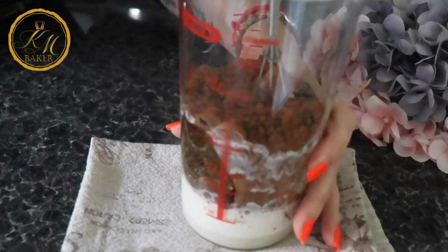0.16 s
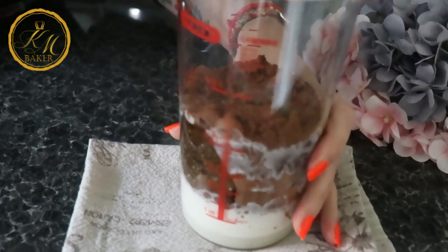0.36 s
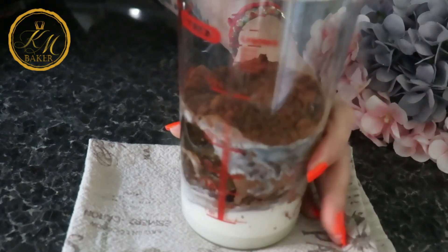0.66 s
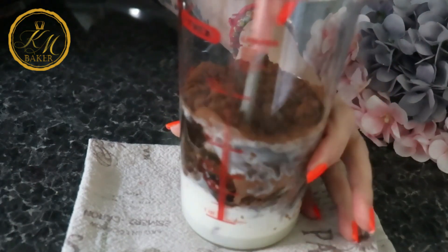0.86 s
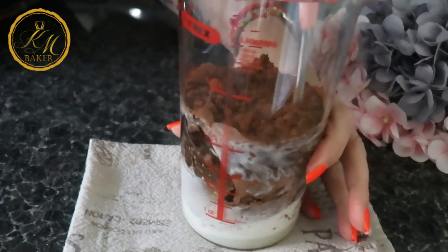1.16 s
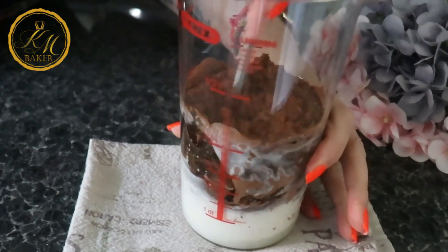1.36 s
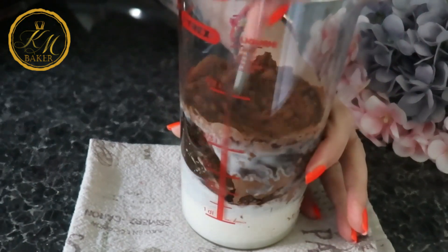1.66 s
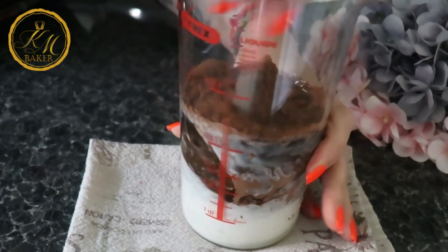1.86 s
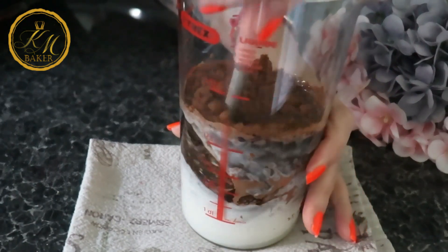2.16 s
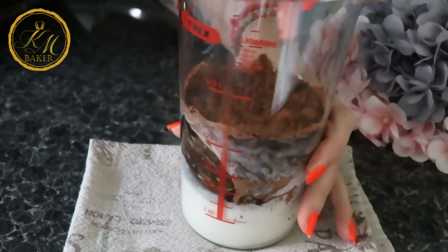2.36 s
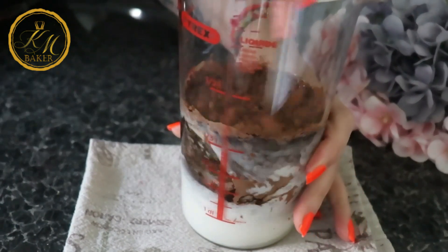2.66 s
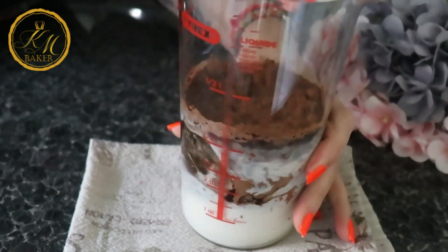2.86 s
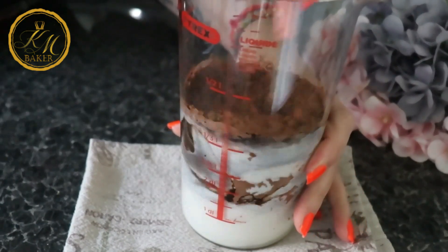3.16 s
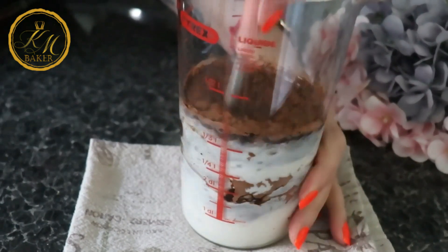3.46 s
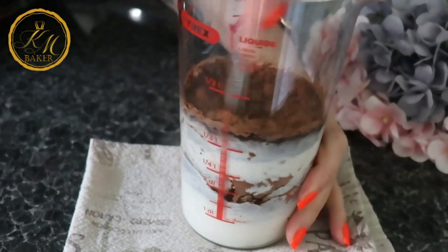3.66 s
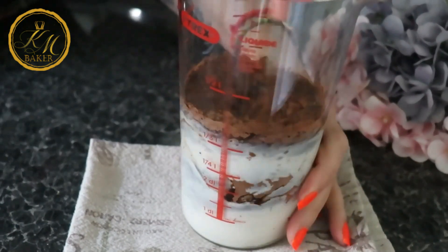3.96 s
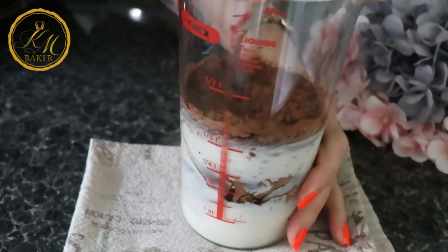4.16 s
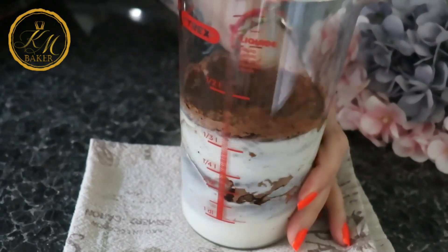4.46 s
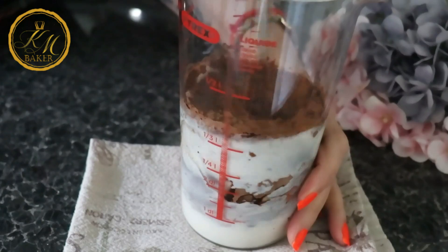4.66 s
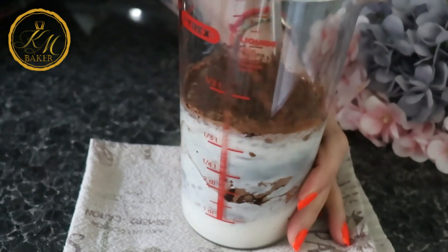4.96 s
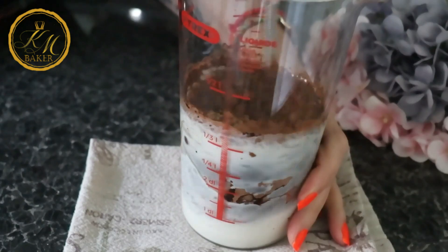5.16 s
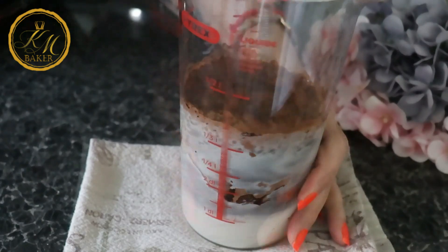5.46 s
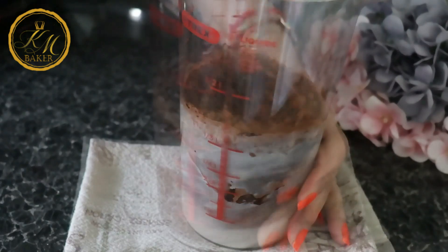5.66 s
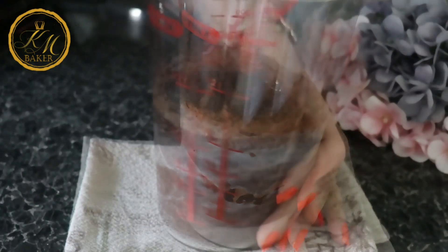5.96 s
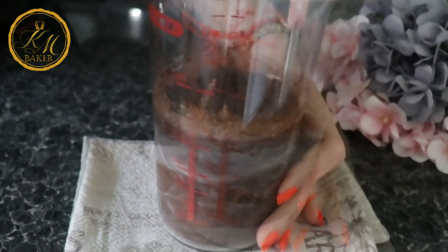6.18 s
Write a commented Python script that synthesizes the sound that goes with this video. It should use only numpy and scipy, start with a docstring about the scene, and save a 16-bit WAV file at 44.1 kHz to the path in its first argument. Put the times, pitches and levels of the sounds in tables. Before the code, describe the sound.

Close, light whisk clicks on a plastic jug with occasional hollow knocks; early on a bird whistles and trills, and the taps grow harder later.

```python
"""A small wire whisk stirs powder and milk in a tall plastic jug on a kitchen counter, close to a two-port microphone.
Filtered noise makes the room: a faint low hum throughout and a hiss that sinks over the first two seconds.
From 0.4 s short noise bursts through resonances tick as wires on the wall; decaying sines ring the knocked jug.
From 0.7 to 1.8 s a songbird outside rasps, whistles downwards and trills: near sines with swept or warbling pitch.
Ticks go on to 6.3 s; a low rumble passes between 4.4 and 5.1 s, and the hiss swells from 5.9 s and sinks at the end."""
import sys
import numpy as np
from scipy import signal
from scipy.fft import rfft, irfft
from scipy.io import wavfile
from scipy.ndimage import uniform_filter1d

SR = 44100
rng = np.random.default_rng(int(sys.argv[2]) if len(sys.argv) > 2 else 0)


def voltage_ratio(level):
    """Linear amplitude factor for a level in decibels (scalar or array-like)."""
    return 10 ** (np.asarray(level, float) / 20)


def file_out(sig):
    """Save sig as 16-bit WAV at sys.argv[1]."""
    # one column per channel
    cols = np.atleast_2d(sig).T
    # limit, then scale
    lim = np.clip(cols, -1, 1)
    pcm = np.round(lim * 32767).astype(np.int16)
    wavfile.write(sys.argv[1], SR, pcm)


N = 278712
T = np.arange(N) / SR
F = np.fft.rfftfreq(N, 1 / SR)
LEFT_RIGHT = np.array([[1], [-1]])  # opposite signs at the two ports


def along(table, hz=F):
    """Read (frequency [Hz], value) points on a log-frequency axis."""
    return np.interp(np.log(hz + 1), np.log(np.array(table)[:, 0]), np.array(table)[:, 1])


def over(table):
    """Read (time [s], value) points at every sample."""
    return np.interp(T, *np.transpose(table))


def unit(x):
    """Scale to rms 1."""
    return x / np.sqrt(np.mean(x ** 2))


def add(out, s, sound):
    """Mix a sound in at s seconds."""
    i = int(s * SR)
    out[..., i:i + sound.shape[-1]] += sound[..., :max(N - i, 0)]


def kitchen_air():
    """Noise in three layers: a low hum, a hiss whose level moves, and a passing rumble around 35 Hz."""
    # colour of the room noise: (frequency [Hz], relative level [dB])
    air = [(13, -54), (22, -25), (81, -11.5), (245, -24.5), (876, -4), (2070, -7), (3500, -10.5),
           (11800, -19), (15200, -23.5), (16500, -59.5)]
    # hiss: (time [s], rms level [dB])
    hiss_level = [(0, -67), (.27, -69.5), (.36, -72), (1.0, -75), (2.0, -80.5), (5.88, -80.5),
                  (5.94, -65.5), (6.15, -64.5), (6.32, -87)]
    # passing low rumble: (time [s], rms level [dB])
    rumble_level = [(4.4, -100), (4.55, -69), (4.9, -71.5), (5.1, -100)]
    hum_db = -78.5
    mid, side = rfft(rng.standard_normal((2, N))) * voltage_ratio(along(air))
    # the bass is more alike at the two ports than the treble
    both = mid + np.clip(F / 900, .5, 1) * side * LEFT_RIGHT
    low = 1 / (1 + (F / 300) ** 4)
    hum = unit(irfft(both * low, N))
    hiss = unit(irfft(both * (1 - low), N))
    deep = np.exp(-(np.log2((F + 1) / 35) / .5) ** 2)
    rumble = unit(irfft(rfft(rng.standard_normal((2, N))) * deep, N))
    return voltage_ratio(hum_db) * hum + voltage_ratio(over(hiss_level)) * hiss + voltage_ratio(over(rumble_level)) * rumble


def ring(modes, chance, length, rise, scatter_db, tilt_db=0):
    """One blow on damped modes, each with its own strength, tuning and sign; peak 1."""
    hz, db, t60 = np.array(modes, float).T[:, :, None]
    strength, sign, tuning = chance[:3, :len(hz), None]
    t = np.arange(int(length * SR)) / SR
    size = voltage_ratio(db + tilt_db + scatter_db * strength) * np.sign(sign)
    tones = np.sin(2 * np.pi * hz * (1 + 0.018 * tuning) * t)
    y = (size * tones * 1000 ** (-t / t60)).sum(axis=0)
    y = y * (1 - np.exp(-t / rise))
    return y / np.abs(y).max()


def jug():
    """Harder blows ring the jug body, most near the favoured mode, and thud into the counter."""
    # blows that shake the whole jug: (time [s], level [dB], favoured ring [Hz], counter thud over the ring [dB])
    knocks = [(0.415, -59, 726, -31), (0.98, -38, 442, -14), (1.338, -27.5, 378, -22),
              (1.683, -41.5, 490, -2), (1.978, -47, 630, -11.5), (2.011, -67, 503, 15),
              (2.251, -46, 670, -12.5), (3.312, -38.5, 602, -10.5), (3.533, -22.5, 435, -23),
              (3.763, -35.5, 647, -17.5), (5.688, -50, 770, -26), (6.06, -26.5, 436, -24)]
    # jug body modes: (frequency [Hz], level [dB], t60 before the hand damps it [s])
    body_modes = [(286, -6.5, 0.021), (352.7, -6, 0.24), (378, -5.5, 0.1), (490.4, -9.5, 0.43),
                  (537.5, 5.5, 0.098), (628.6, 7, 0.077), (691, 3.5, 0.094), (768, 2, 0.17),
                  (1660, -12, 0.038), (2100, -11.5, 0.065), (2640, -9, 0.05)]
    # counter modes: (frequency [Hz], level [dB], t60 [s])
    counter_modes = [(76, 0, 0.26), (106, 0, 0.26), (135, 4, 0.17), (207, 2, 0.22)]
    grip_s, grip_share = .022, .45  # the hand soon damps the ring to this share
    rocking_db = 4  # most the level drifts either way as the base rocks on the towel
    out = np.zeros(N)
    chance = rng.standard_normal((len(knocks), 3, 20))
    drift = uniform_filter1d(uniform_filter1d(rng.standard_normal(N), size=200), size=200)
    rocking = voltage_ratio(rocking_db * np.tanh(unit(drift)))
    mode_hz = np.array(body_modes)[:, :1]
    for (s, db, ring_hz, thud_db), c in zip(knocks, chance):
        near_db = 10 * np.exp(-(np.log2(mode_hz / ring_hz) / .4) ** 2)
        body = ring(body_modes, c, .4, 0.00064, 2.2, near_db)
        body = body * (grip_share + (1 - grip_share) * np.exp(-T[:len(body)] / grip_s))
        thud = ring(counter_modes, c[:, 14:], .4, 0.0013, 2.2)
        add(out, s, voltage_ratio(db) * (body + voltage_ratio(thud_db) * thud))
    return out * rocking


def touches():
    """Every tick, the weak bounce of a trailing wire after it, and a wire dragging on towards a close next tick."""
    # wire on wall: (time [s], level [dB], favoured ring [Hz], wall over wires [dB], upper wires over wires [dB])
    tick_table = [(0.419, -31.5, 3180, -41, -3), (0.4361, -29.5, 7660, -52, -15),
                  (0.5937, -44, 3800, -16.5, -27), (0.7558, -29, 3030, -26, -65),
                  (0.939, -39.5, 6400, -46, -36), (0.9797, -32.5, 5000, 1.5, -2.5),
                  (1.089, -30.5, 5600, -24, -12), (1.1448, -38.5, 7000, -59, -12),
                  (1.3349, -30, 7250, -6, -19.5), (1.349, -33, 2580, -19, -29),
                  (1.3703, -41, 4400, -6, -7.5), (1.406, -31, 3380, -67, -7.5),
                  (1.4235, -28.5, 7200, -20, -20.5), (1.493, -30.5, 3340, -46, -12.5),
                  (1.684, -22, 4630, -8.5, -7.5), (1.691, -23, 2310, -19, -17),
                  (1.728, -23.5, 6050, -13.5, -6.5), (1.738, -31.5, 3950, -30, -13),
                  (1.7832, -32.5, 5040, -22, -5), (1.904, -31.5, 3510, -23, -81),
                  (1.937, -25, 3600, -33, -27.5), (1.9645, -34.5, 3710, -22, -4),
                  (1.9787, -29.5, 5400, -20.5, -11.5), (2.0327, -30.5, 7000, -27, -7.5),
                  (2.2041, -40, 7740, -11, -9.5), (2.242, -38.5, 6900, -5.5, -18),
                  (2.2485, -32.5, 5330, -4.5, -9.5), (2.2893, -31.5, 5300, -8.5, -6),
                  (2.3413, -40.5, 6900, -13.5, -12), (2.4893, -25, 3950, -21, -28),
                  (2.5108, -33, 4830, -16.5, -7.5), (2.549, -28, 5550, -33, -17),
                  (2.568, -37, 5600, -17.5, -1.5), (2.607, -50, 6000, -13, -2),
                  (2.671, -33, 5540, -41, -11.5), (2.776, -37.5, 3330, -28.5, -46),
                  (2.8045, -29, 6050, -58.5, -8), (2.8427, -28.5, 10700, -24.5, -0.5),
                  (2.876, -42, 4550, -21, 0.5), (3.0068, -26.5, 3260, -22.5, -20),
                  (3.039, -29.5, 3410, -42.5, -20), (3.0696, -28.5, 2970, -28, -9.5),
                  (3.104, -21.5, 6070, -26, -2.5), (3.1249, -22.5, 3860, -17, -4.5),
                  (3.29, -32.5, 6400, -17.5, -10), (3.3083, -19.5, 5660, -23.5, -13.5),
                  (3.3133, -24.5, 5670, -16.5, -8), (3.411, -39.5, 6400, -17.5, -13),
                  (3.4983, -43.5, 9130, -1, 6.5), (3.5355, -30.5, 2560, 3.5, -3.5),
                  (3.5667, -30.5, 6200, -11.5, -29.5), (3.592, -29, 6920, -15, -1.5),
                  (3.6185, -41, 3630, -26, -1), (3.7618, -35.5, 2420, -5.5, -7.5),
                  (3.7691, -30, 5750, -11, -11.5), (3.805, -30, 7200, -22.5, -1.5),
                  (3.8346, -38.5, 5540, -22, -42), (3.902, -48, 2920, -8, -24.5),
                  (3.9857, -16.5, 3440, -60.5, -6), (4.003, -29, 6900, -17, -19),
                  (4.033, -34, 3940, -43, -11.5), (4.078, -28, 3900, -28.5, -19.5),
                  (4.178, -29.5, 5530, -23.5, -24), (4.1892, -29, 8470, -65, -6.5),
                  (4.2219, -24, 7430, -31, -1), (4.254, -38.5, 3750, -50, -9.5),
                  (4.4197, -15, 2730, -35, -12), (4.4626, -30.5, 4800, -74, -10.5),
                  (4.632, -25, 3870, -2.5, -42.5), (4.8151, -20, 3040, -12.5, -31),
                  (4.852, -42, 4773, -7.5, -35), (4.9885, -12.5, 4900, -21.5, -3.5),
                  (5.1508, -16, 8330, -18, -4.5), (5.32, -15.5, 8190, -17.5, -4),
                  (5.4916, -15.5, 6840, -16.5, -3.5), (5.5946, -50.5, 3360, -6.5, -39.5),
                  (5.6874, -15, 6160, -21, -12), (5.7035, -45, 3200, -9, -23.5),
                  (5.786, -38.5, 3940, -4.5, -38), (5.9017, -21, 3780, -5, -28),
                  (5.9433, -37, 3340, -2.5, -8.5), (6.0494, -32, 3630, 2.5, 2),
                  (6.0608, -16.5, 2630, -4.5, -23), (6.0945, -37, 3970, 4, -0.5),
                  (6.1209, -35.5, 3600, -33, -12), (6.166, -34, 5600, -8.5, -16),
                  (6.22, -39, 3400, -9, -29), (6.275, -39, 3650, -27, -27)]
    bounce_s, bounce_spread_s = .03, .007  # delay after the tick
    bounce_db, bounce_spread_db = -29, 3  # relative to the tick
    drag_gap_s = .05  # wires drag between ticks closer than this
    drag_db, drag_spread_db = -12, 4  # relative to the weaker of the two ticks
    ticks = np.array(tick_table)
    chance = rng.standard_normal((len(ticks), 3))
    bounces, drags = ticks.copy(), ticks.copy()
    bounces[:, :2] += [bounce_s, bounce_db] + chance[:, :2] * [bounce_spread_s, bounce_spread_db]
    gap = np.diff(ticks[:, 0], append=N)  # the last tick has no close neighbour
    drags[:, 0] += gap * rng.uniform(.3, .9, len(ticks))
    weaker_db = np.minimum(ticks[:, 1], np.roll(ticks[:, 1], -1))
    drags[:, 1] = weaker_db + drag_db + drag_spread_db * chance[:, 2]
    return np.concatenate([ticks, bounces, drags[gap < drag_gap_s]])


def clatter(push, modes, chance, scatter_db, broad, tilt_db=0):
    """A push spectrum through steep resonances of uneven strength; fixed energy."""
    hz, db, width = np.array(modes, float).T[:, :, None]
    tuning, strength = chance[:2, :len(hz), None]
    f = np.linspace(0, SR / 2, len(push))
    hz = hz * (1 + .03 * tuning)
    width = width * broad
    size = voltage_ratio(db + tilt_db + scatter_db / broad * strength)
    resonance = f * width / (hz ** 2 - f ** 2 + 1j * f * width)
    y = irfft(push * (size * resonance ** 3).sum(axis=0))
    return y / np.sqrt((y ** 2).sum() / 14)


def whisk():
    """Each tick: several wires land within milliseconds and chatter on, ringing wires and wall."""
    # damped modes of the wires, the wall and the upper wires, each:
    # (frequency [Hz], level [dB], resonance width in a tick of -30 dB or softer [Hz])
    wires = [(2580, -2, 360), (3260, 0, 560), (3600, 5, 674), (4145, 3, 800), (4900, 3, 680),
             (5600, 5.5, 340), (6400, 3.5, 830), (7000, 7.5, 470), (7740, 4.5, 2330)]
    wall = [(816, -3.5, 67), (930.6, 7.5, 130), (1070, 8, 310), (1307, 8, 370), (1487, 4, 170),
            (1839, 6.5, 630)]
    sheen = [(8516, 14, 250), (10130, 10, 1300), (10740, 5, 1600), (14600, -9, 260), (12400, -3.5, 2200)]
    contact_s, firming_db = 0.00036, 55  # time constant at -31 dB; ten times shorter for so many dB more
    lead_in_s = .0022  # a brief random crackle leads into each tick with this time constant
    broadening_db = 20  # a tick so much harder than -30 dB rings twice as broad and half as uneven
    wire_hum_db, wire_hum_t60_s = -21, 0.052  # peak of the hum relative to the tick's
    pan_db = 3.2  # most each port gains or loses as a tick leans to one side
    lead = .02  # seconds before the landing
    out = np.zeros((2, N))
    t = np.arange(4096) / SR - lead
    after = np.clip(t, 0, 1)
    edges = signal.windows.tukey(len(t), .3)
    hits = touches()
    chance = rng.standard_normal((len(hits), 2, len(t)))
    wire_hz, sheen_hz = np.array(wires)[:, :1], np.array(sheen)[:, :1]
    singing = np.array(wall + wires + sheen, float)
    singing[:, 2] = wire_hum_t60_s
    for (s, db, ring_hz, wall_db, treble_db), c in zip(hits, chance):
        # a harder tick is a shorter contact
        phase = after / (contact_s * 10 ** (-(db + 31.0) / firming_db))
        landing = phase ** 3 * np.exp(3 - phase) / 27
        # a random crackle grows into the landing; after it, wires touch again ever more weakly
        swell_and_fade = np.exp(-np.abs(t) / np.where(t > 0, .02, lead_in_s))
        crackle = voltage_ratio(-8.5) * (np.abs(c[1]) > 2.2) * swell_and_fade
        push = rfft(c[0] * (landing + crackle))
        # so short a contact pushes all frequencies about alike
        push = push / uniform_filter1d(np.abs(push), size=40)
        broad = 2 ** (max(db + 30, 0) / broadening_db)
        near_wire_db, near_sheen_db = [15.0 / broad * np.exp(-(np.log2(hz / ring_hz) / 0.091) ** 2)
                                       for hz in (wire_hz, sheen_hz)]
        # a dull contact also mutes the higher wires
        dull_db = .5 * treble_db * np.clip(np.log2(wire_hz / 4000), 0, 1)
        y = clatter(push, wires, c, 3.5, broad, near_wire_db + dull_db)
        y = y + voltage_ratio(wall_db) * clatter(push, wall, c[:, 20:], 4.5, broad)
        y = y + voltage_ratio(treble_db) * clatter(push, sheen, c[:, 40:], 3.5, broad, near_sheen_db)
        # free wires and the wall hum on, thin and faint
        share_db = np.repeat([wall_db, 0, treble_db], [len(wall), len(wires), len(sheen)])[:, None]
        share_db = share_db + 9 / broad * np.exp(-(np.log2(singing[:, :1] / ring_hz) / 0.63) ** 2)
        hum = ring(singing, c[[0, 1, 1], 80:], t[-1], .003, 6, share_db)
        y[-len(hum):] += voltage_ratio(wire_hum_db) * hum * np.abs(y).max()
        lean_db = pan_db * np.tanh(c[0, 60]) * LEFT_RIGHT
        add(out, s - lead, voltage_ratio(db + lean_db) * y * edges)
    return out


def echo(x, stretch, gap, hold):
    """Diffuse noise tail, more alike at both ports in the bass; each half octave dies at its own rate."""
    # room decay before stretching: (frequency [Hz], t60 [s])
    kitchen = [(100, 0.17), (500, 0.087), (1500, 0.14), (5000, 0.11), (16000, 0.087)]
    t = np.arange(SR // 2) / SR
    f = np.fft.rfftfreq(len(t), 1 / SR)
    mid, side = rfft(rng.standard_normal((2, len(t))))
    noise = mid + np.clip(f / 2200, .3, 1) * side * LEFT_RIGHT
    tail = 0
    for hz in 70 * 2 ** np.arange(0, 8, .5):
        window = np.clip(1 - 2 * np.abs(np.log2((f + 1) / hz)), 0, 1)
        band = irfft(noise * window, len(t))
        tail = tail + band * 1000 ** (-t / (stretch * along(kitchen, hz)))
    # it builds up over gap seconds and thins out after hold seconds
    tail = tail * (1 - np.exp(-(t / gap) ** 2)) * (0.063 + np.exp(-(t / hold) ** 6))
    tail = tail / np.sqrt((tail ** 2).sum() / 2)
    return signal.fftconvolve(x[None], tail, axes=1)[:, :N]


def note(s, hz, gain, depth, rate_hz, unsteady):
    """A near sine broken into quick falling slurs, a trill when slow and a rasp when fast."""
    cycle = np.cumsum(rate_hz * (1 + unsteady[int(s * SR):][:len(hz)])) / SR % 1
    depth = np.clip(depth, 0, 1)
    phase = 2 * np.pi * np.cumsum(hz * (1 - depth * (2 * cycle - 1))) / SR
    # the air stops between slurs
    throb = np.sin(np.pi * cycle) ** np.minimum(30 * depth, 2)
    return gain * throb * signal.windows.tukey(len(hz), .1) * np.sin(phase)


def bird():
    """Rasps swell and climb a little, falls drop quickly to a resting pitch, one trill sinks at its end."""
    # swelling notes: (start [s], length [s], starting pitch [Hz], final level [dB], warble depth [share of pitch])
    rasps = [(0.675, 0.153, 1760, -56, 0.001), (.89, 0.058, 3710, -44, 0.2), (.9, 0.06, 5200, -49, 0.06),
             (1.052, 0.036, 3700, -36, 0.059), (1.07, 0.033, 4770, -46, 0.19),
             (1.36, 0.078, 6840, -39, 0.038), (1.777, 0.046, 5300, -45.5, 0.064)]
    # falling notes: (start [s], length [s], top [Hz], resting pitch [Hz], level [dB], drop time constant [s])
    falls = [(0.947, 0.046, 4250, 2530, -32.5, 0.0095), (1.091, 0.047, 4200, 2420, -31, 0.0096),
             (1.435, 0.041, 7340, 5350, -42, 0.023), (1.718, 0.015, 3600, 1282, -33, 0.0135)]
    # course of the trill: (time [s], pitch [Hz], level [dB])
    trill = [(1.521, 3070, -72), (1.542, 3305, -32.5), (1.613, 3110, -26.5), (1.636, 2850, -29.5),
             (1.653, 2180, -32.5), (1.667, 2220, -38.5)]
    swell_db, rise = 17, 0.019  # gained over a rasp: level, share of pitch
    warbles_per_cycle, warble_spread = 0.039, .25  # mean warble rate over pitch, its spread as a share
    ragged_db, ragged_pitch = 50, .3  # level and pitch share per unit of raggedness
    fall_attack_s = .006
    trill_hz, trill_depth = 76.1, 0.11  # mean slur rate, depth at the highest pitch
    out = np.zeros(N)
    unsteady = unit(uniform_filter1d(rng.standard_normal(N), 300))
    for s, length, hz, db, depth in rasps:
        done = np.linspace(0, 1, int(length * SR))
        # the deeper the warble, the more ragged the note
        ragged = depth * np.tanh(unsteady[::-1][int(s * SR):][:len(done)])
        gain = voltage_ratio(db - swell_db * (1 - done) + ragged_db * ragged)
        pitch = hz * (1 + rise * done + ragged_pitch * ragged)
        add(out, s, note(s, pitch, gain, depth, warbles_per_cycle * hz, warble_spread * unsteady))
    for s, length, top_hz, rest_hz, db, drop_s in falls:
        t = np.arange(0, length, 1 / SR)
        pitch = rest_hz + (top_hz - rest_hz) * np.exp(-t / drop_s)
        gain = voltage_ratio(db) * (1 - np.exp(-(t / fall_attack_s) ** 2))
        add(out, s, note(s, pitch, gain, 0, 1, unsteady))  # depth 0: no slurs
    s, hz, db = np.transpose(trill)
    t = np.arange(s[0], s[-1], 1 / SR)
    pitch = np.interp(t, s, hz)
    # the slurs merge into one glide as the pitch sinks
    depth = trill_depth * (pitch / hz.max()) ** 3
    add(out, s[0], note(s[0], pitch, voltage_ratio(np.interp(t, s, db)), depth, trill_hz, 0.035 * unsteady))
    return out


def scene():
    """Whisk and jug are near, the bird reaches in with a longer tail; two ports pick them up over the room air."""
    # colour of the ports: (frequency [Hz], left minus right [dB])
    port_balance = [(60, -17), (110, -9.5), (200, -4), (380, -15), (700, 0.5), (1290, -0.5), (2380, -0.5),
                    (4400, -6.5), (8120, 2), (15000, 21.5)]
    port_lag_s = .00003  # sound reaches the left port so much earlier
    air = kitchen_air()
    body, ticks, song = jug(), whisk(), bird()
    tick_tail = voltage_ratio(-12) * echo(ticks.mean(axis=0), 0.8, 0.0066, 0.16)
    body_tail = voltage_ratio(-2.5) * echo(body, 1.0, 0.0068, 0.052)
    near = ticks + body + tick_tail + body_tail
    far = song + voltage_ratio(-12.5) * echo(song, 1.5, .04, 0.12)
    sides = LEFT_RIGHT / 2  # half the difference goes to each port
    ports = voltage_ratio(along(port_balance) * sides) * np.exp(2j * np.pi * F * port_lag_s * sides)
    return irfft(rfft(near + far) * ports, N) + air


def top_cut(x):
    """Nothing passes above the cut-off."""
    return signal.sosfilt(signal.butter(12, 16700, fs=SR, output="sos"), x)


def record(dry):
    """Pass the finished mix through the last stage of the chain."""
    return top_cut(dry)


dry = scene()
out = record(dry)
file_out(out)
```